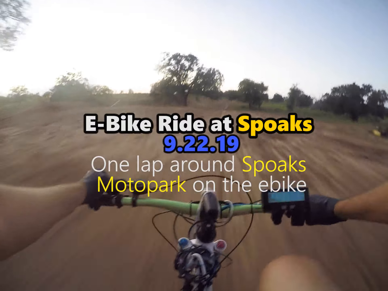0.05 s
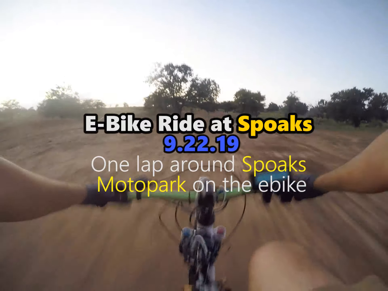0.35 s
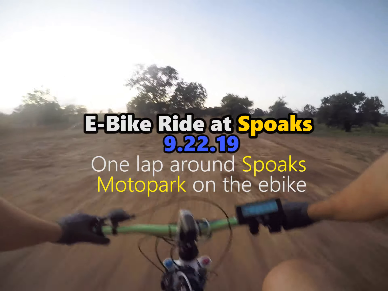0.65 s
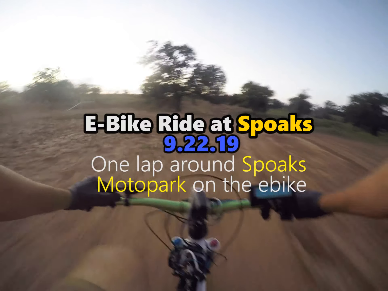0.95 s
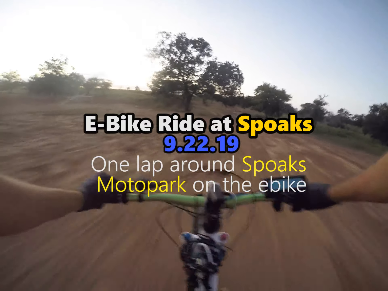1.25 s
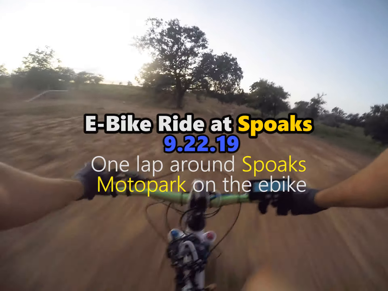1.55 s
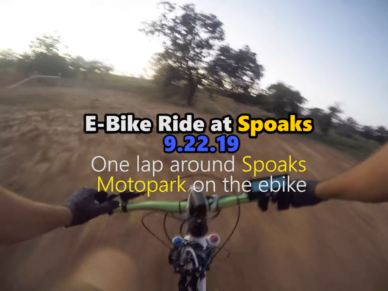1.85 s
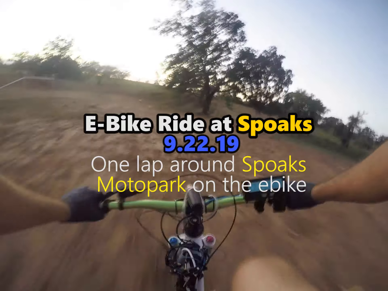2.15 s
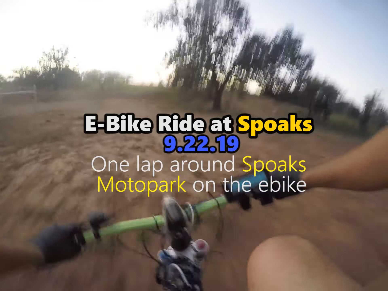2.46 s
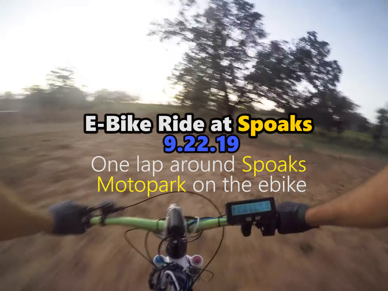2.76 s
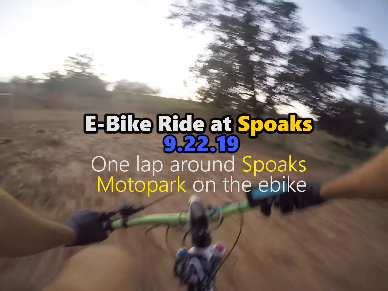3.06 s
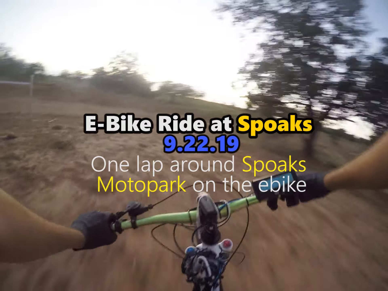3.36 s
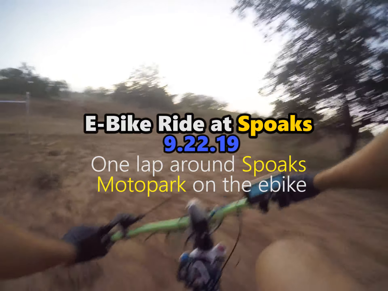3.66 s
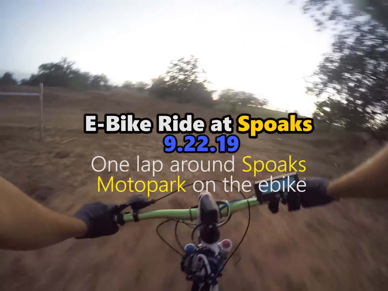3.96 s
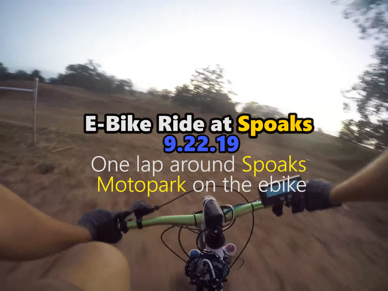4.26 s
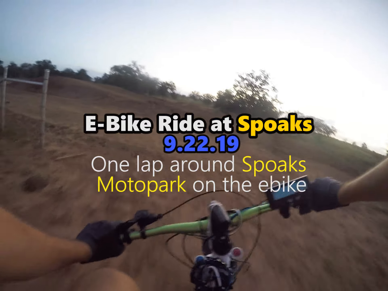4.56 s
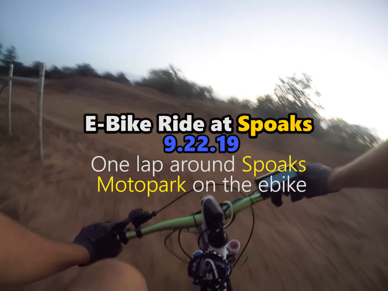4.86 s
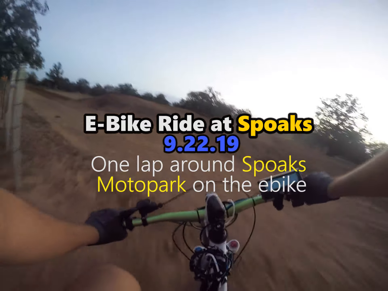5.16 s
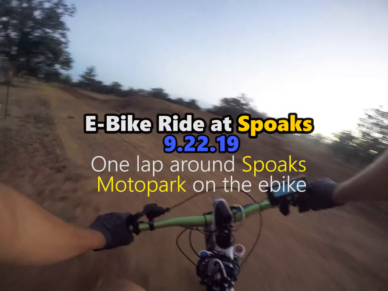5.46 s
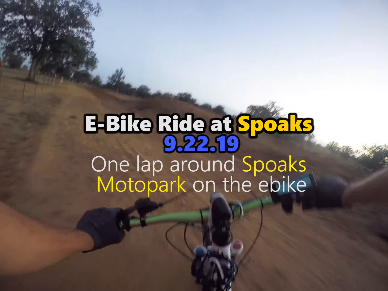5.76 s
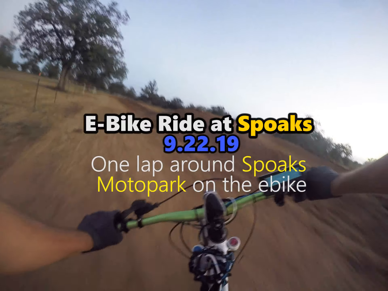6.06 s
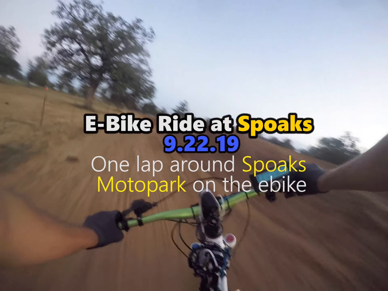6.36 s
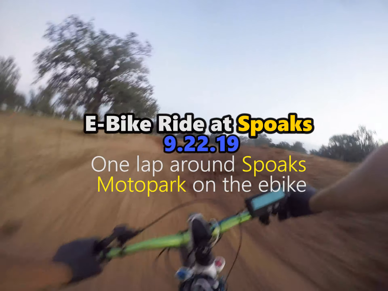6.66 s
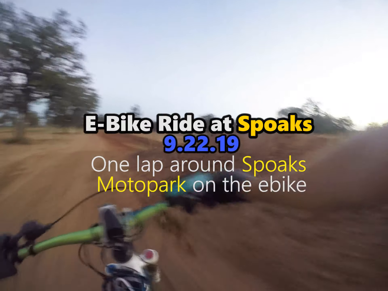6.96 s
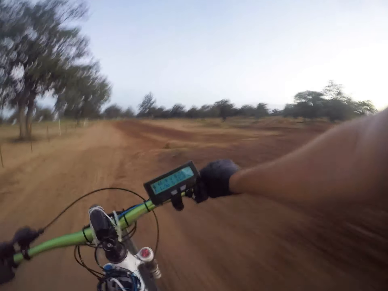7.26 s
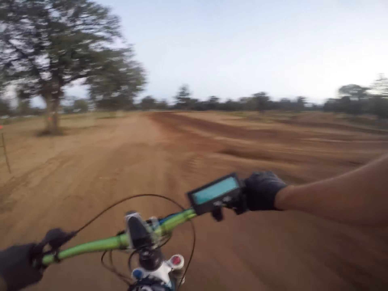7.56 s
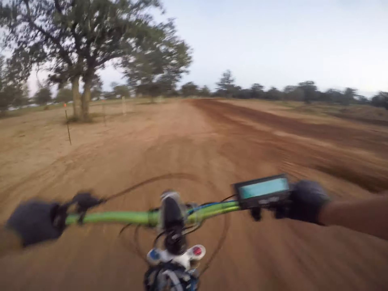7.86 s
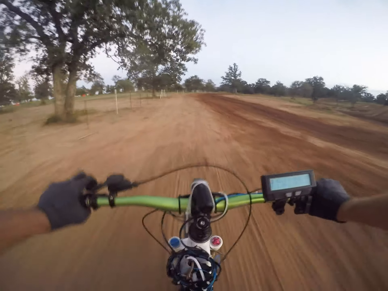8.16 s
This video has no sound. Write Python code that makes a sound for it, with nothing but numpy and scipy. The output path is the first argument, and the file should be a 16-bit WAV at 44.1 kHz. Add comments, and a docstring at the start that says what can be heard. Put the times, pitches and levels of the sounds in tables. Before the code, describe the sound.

An electric mountain bike rides over a dirt track, heard close up from the rider's chest. For the first two seconds or so, knobby tyres drone and rumble, grit crunches and wind thumps on the microphone. Bumps give brief rattles and stones ping off the bike, most sharply around 1.3 seconds. From about 2.4 seconds the bike coasts: the rumble and wind die down and the freewheel ticks faintly, slowing. At 4.1 seconds the motor cuts in with a warble and a few tiny metal squeaks. From 4.5 seconds its gear whine grows louder and climbs in pitch over a rasp and a bright chain sizzle, with more scattered pings. Near 7 seconds the wind and tyre rumble surge, and heavy buffeting continues with the high whine until the end, at about 8.3 seconds.

```python
"""Knobby tyres drone on a dirt track: an electric mountain bike, heard from the rider's chest.
Grit crunches, stones ping off the frame, bumps rattle it. The bike coasts into a bend, the drone fades
and the freewheel ticks. At 4.1 s the geared motor cuts in with a warble, then its meshing teeth whine
up to speed over a rasp while wind buffets the microphone harder."""
import sys
import numpy as np
from scipy import signal
from scipy.fft import rfft, irfft
from scipy.io import wavfile

SR = 44100
rng = np.random.default_rng(int(sys.argv[2]) if len(sys.argv) > 2 else 0)


def int16_out(signal):
    """Quantize to a 16-bit WAV file."""
    q = np.round(np.clip(np.atleast_2d(signal).T, -1, 1) * 32767)
    wavfile.write(sys.argv[1], SR, q.astype(np.int16))


N = 366030

# motor speed: (time [s], gear mesh rate [Hz])
MESH_RATE = [(4.1, 622.4), (4.55, 633.5), (4.95, 777), (5.28, 781), (5.66, 851), (5.76, 916), (5.87, 958),
             (6.06, 961), (6.13, 1072), (6.38, 1012), (6.65, 1083), (6.84, 1141), (6.92, 1092),
             (7.06, 1186), (7.45, 1267), (7.86, 1368), (8.05, 1329), (8.3, 1353)]
# motor pull: (time [s], level [dB])
MOTOR_EFFORT = [(4.08, -87), (4.105, -46), (4.22, -33), (4.33, -38.5), (4.5, -35.5), (4.6, -31),
                (5.22, -28.5), (5.45, -29), (5.68, -32), (5.82, -29), (6.17, -25.5), (6.42, -28.5),
                (7.2, -23.5), (7.85, -23.5), (8.3, -25.5)]
# pushes that load the teeth: (start [s], end [s], gain [dB])
LOAD_PUSHES = [(4.567, 5.417, 6), (5.66, 8.4, 1.5)]
# radiation of gear tones by the motor case: (frequency [Hz], gain [dB])
CASE_RESPONSE = [(600, -47), (800, -21), (960, -11.5), (1200, -10.5), (1530, -7), (1850, -13), (2280, -11),
                 (2560, -2), (2950, -2.5), (3550, 0), (3950, -3.5), (4400, 2.5), (4750, -5), (5250, -7.5),
                 (5800, -14), (6500, -17), (7500, -31), (11000, -32)]
# gear and chain rasp: (frequency [Hz], density [dB])
RASP_SPECTRUM = [(600, -22), (950, -20), (1350, 3.5), (1850, -8), (2150, -6), (2400, -6), (3000, 1),
                 (3500, -3.5), (4300, 0.5), (5600, -9.5), (6500, -7.5), (7400, -38), (10000, -29)]
# drive housing resonances: (frequency [Hz], bandwidth [Hz], level [dB])
HOUSING_MODES = [(1530, 75, -30), (2100, 98, -26.5), (2980, 130, -13), (3103, 93, -8), (4510, 110, -14),
                 (5110, 170, -13.5), (6450, 920, -22)]
# motor hunting: (start [s], rise [s], fall [s], foot [Hz], top [Hz], level [dB])
HUNT_SWOOPS = [(4.097, 0.047, 0.027, 2990, 3290, -36.5), (4.178, .068, 0.032, 2830, 4270, -39.5),
               (4.295, .093, 0.043, 2750, 3300, -36), (4.435, 0.04, 0.093, 2890, 3230, -37),
               (4.548, 0.057, .06, 2900, 3370, -44)]
# low rumble of the tyres, swelled by wind near 7 s: (time [s], level [dB])
RUMBLE_LEVEL = [(0.0, -29), (1.1, -31.5), (2.1, -30), (3.0, -38), (3.9, -47), (4.45, -45), (4.78, -35),
                (5.0, -37), (5.6, -38.5), (6.3, -34.0), (6.72, -31), (6.97, -23.1), (7.45, -24.5),
                (8.3, -35)]
# low rumble: (frequency [Hz], density [dB])
RUMBLE_SPECTRUM = [(100, -14), (150, -9.5), (205, -8.5), (270, 0), (390, -2.5), (490, -5.5), (620, -14),
                   (800, -24), (1200, -28.5), (3000, -65)]
# crushed dirt: (frequency [Hz], density [dB])
CRUNCH_SPECTRUM = [(530, -24), (900, -10), (1130, 1), (1780, -5), (2150, -3.5), (2450, 1), (3130, -0.5),
                   (3480, -8), (4010, -5), (6200, -11), (7400, -26.5), (8630, -25.5), (10100, -28.5),
                   (11700, -41), (15000, -26.5)]
# loose dirt: (centre [s], half length [s], boost [dB])
DIRT_PATCHES = [(.16, 0.14, 4.5), (1.6, 0.62, 4.5), (2.25, 0.65, 3.5), (3.02, 0.094, 5.5),
                (3.45, 0.084, 3.5)]
# stone and chain strikes on the frame: (time [s], level [dB])
FRAME_STRIKES = [(0.0804, -14.5), (1.3013, -8), (1.384, -9), (1.4576, -28.5), (1.7674, -45), (2.159, -31),
                 (2.2948, -30.5), (2.404, -34.5), (2.878, -36), (4.7573, -17.5), (4.766, -24),
                 (4.8464, -29), (5.182, -20), (5.541, -25), (5.794, -20.5), (7.8423, -22), (8.014, -24),
                 (8.2696, -17)]
# frame resonances: (frequency [Hz], gain [dB], t60 [s])
FRAME_MODES = [(2400, -20.5, 0.034), (4170, -5, 0.013), (4690, 6.5, 0.0067), (5380, 8.5, 0.0038),
               (6700, -14.5, 0.021), (8970, -16, 0.012), (10400, -12.5, 0.0068), (14200, -36, 0.0098)]
# bumps in the track: (time [s], level [dB])
BUMPS = [(0.0074, -24.5), (0.7218, -30), (0.939, -34.5), (1.096, -26), (1.1374, -32), (1.475, -29.5),
         (1.7824, -28), (2.0708, -27.5), (2.291, -27.5), (2.879, -33), (2.9626, -30.5), (3.2322, -35.5),
         (3.5235, -37.5)]
# wind, low in the bend, back with speed: (time [s], buffet level [dB], flutter level [dB])
WIND_LEVELS = [(0, -32, -35.5), (1.35, -26.5, -31), (2.2, -25.5, -34.5), (2.4, -28, -45),
               (3.45, -36.5, -46.5), (3.7, -45, -53), (4.5, -40, -52), (5.05, -36.5, -51),
               (5.25, -37, -40.5), (5.65, -35, -39), (6.3, -27.5, -31), (6.76, -34.5, -34.5),
               (6.92, -23, -18), (7.55, -19.5, -19), (8.3, -23, -21.5)]
# single gusts: (centre [s], half length [s], boost [dB])
WIND_GUSTS = [(0.83, 0.028, 13), (1.99, .05, 5), (2.2, 0.046, 12), (2.89, .08, 4)]
# large eddies: (frequency [Hz], density [dB])
BUFFET_SPECTRUM = [(12, -2), (24, -0.5), (45, 1), (58, -10.5), (75, -21), (150, -20)]
# small eddies: (frequency [Hz], density [dB])
FLUTTER_SPECTRUM = [(45, -3.5), (70, 4), (120, -1.5), (170, -5), (220, -6), (380, -9.5), (560, -25),
                    (720, -58), (3000, -67)]
# chain sizzle: (frequency [Hz], density [dB])
CHAIN_SPECTRUM = [(5000, -25), (7000, 1), (8300, 9), (10300, 6.5), (12200, -18), (13400, 5), (14600, 10),
                  (15400, -16)]
# metal squeaks: (start [s], length [s], pitch [Hz], level [dB])
METAL_SQUEAKS = [(1.553, 0.01, 4970, -30), (2.095, 0.01, 6170, -32), (2.095, .025, 11000, -49),
                 (4.099, 0.066, 5910, -41), (4.16, .025, 6430, -49), (4.193, 0.017, 8400, -48),
                 (4.206, 0.023, 5340, -36.5), (4.228, 0.029, 7780, -54)]

MESH_REF_HZ = 1004   # gear tones are clearest here
PUSH_EDGE_S = 0.08


def motor(mesh_per_turn=26.7, rasp_db=-4, throb_db=2.5, ring_db_per_octave=6):
    """Meshing teeth sing over a rasp that rings the housing; both throb with each rotor turn."""
    mesh_hz = curves(MESH_RATE)[0] * (1 + 0.011 * drift(13))   # bumps tug at the rotor
    effort_db, = curves(MOTOR_EFFORT)
    rotor_rad = phase(mesh_hz / mesh_per_turn * (1 + 0.019 * drift(11.5)))
    rasp = colour(grains(14000, 1.8), RASP_SPECTRUM)
    shake = noise()
    speed_db = ring_db_per_octave * np.log2(mesh_hz / MESH_REF_HZ)
    for hz, width_hz, level_db in HOUSING_MODES:
        t60_s = np.log(1000) / (np.pi * width_hz)
        rasp += from_db(level_db + speed_db) * unit_rms(ring(shake, hz, t60_s))
    rasp *= from_db(rasp_db + throb_db * np.cos(rotor_rad))
    return from_db(effort_db) * (gear_tones(mesh_hz, rotor_rad) + rasp)


def gear_tones(mesh_hz, rotor_rad, wobble=0.011, wear_rad=0.77, side_ratio=1.053, side_db=-8.5):
    """An eccentric gear bends and throbs its harmonics each turn; a side tone runs just above each."""
    engaged = np.clip((times_s() - LOAD_PUSHES[0][0]) / PUSH_EDGE_S + 1, 0, 1)
    loss_db_per_harmonic = 4 * np.abs(np.log2(mesh_hz / MESH_REF_HZ))
    depth_db = 3.5 * (740 / mesh_hz) ** 3.1
    throb_db = depth_db * (np.cos(rotor_rad) + 0.7 * np.cos(rotor_rad / 3))   # sags every third turn
    hz = mesh_hz * (1 + wobble * np.sin(rotor_rad) + 0.00793 * drift(40.56))
    mesh_rad = phase(hz)
    out = 0
    for k in range(1, 9):
        harmonic_rad = k * mesh_rad + wear_rad * drift(91)   # worn teeth meet early or late
        side_tone = from_db(side_db) * np.sin(side_ratio * harmonic_rad + 3 * drift(11.8))
        level_db = throb_db * min(1, 2 / k) ** 2 - k * loss_db_per_harmonic + 3 * drift(34)
        out += (np.sin(harmonic_rad) + side_tone) * gain_at(CASE_RESPONSE, k * hz) * from_db(level_db)
    return out * engaged * from_db(tooth_load_db() - depth_db / 2)


def tooth_load_db(slack_db=-6):
    """Teeth press together during each push and slacken otherwise."""
    t = times_s()
    return slack_db + sum((db - slack_db) * np.clip(np.minimum(t - start_s, end_s - t) / PUSH_EDGE_S, 0, 1)
                          for start_s, end_s, db in LOAD_PUSHES)


def hunting(housing_hz=3200, loss_db_per_octave=20, lower_db=-20, edge_s=0.004):
    """Under light load the third gear harmonic swoops, loudest near the housing's pitch."""
    out, waver = np.zeros(N), 1 + 0.0031 * drift(150)
    for start_s, rise_s, fall_s, foot_hz, top_hz, level_db in HUNT_SWOOPS:
        length_s = rise_s + fall_s
        t, span = event_span(start_s, length_s)
        arch = np.sin(np.pi / 2 * np.interp(t, [0, rise_s, length_s], [0, 1, 2]))
        hz = (foot_hz + (top_hz - foot_hz) * arch) * waver[span]
        mesh_rad = phase(hz) / 3
        lower_tones = from_db(lower_db) * (np.sin(mesh_rad) / 2 + np.sin(2 * mesh_rad))
        gain = from_db(level_db - loss_db_per_octave * np.abs(np.log2(hz / housing_hz)))
        fade = np.minimum(np.minimum(t, length_s - t) / edge_s, 1)
        out[span] += np.sqrt(2) * gain * fade * (np.sin(3 * mesh_rad) + lower_tones)
    return out * from_db(3 * drift(55))


def tyres(tread_hz=292, upright_db=-28.5, leaned_db=-50.5, lean_at_s=1.29, fade_db_per_s=17.5):
    """Casing rumble, swelled by wind near 7 s; centre tread blocks drum a note that fades with lean."""
    rumble_db, = curves(RUMBLE_LEVEL)
    rumble = from_db(rumble_db + 2 + 1.97 * drift(16)) * colour(noise(), RUMBLE_SPECTRUM)
    tread_db = np.maximum(upright_db - fade_db_per_s * np.maximum(times_s() - lean_at_s, 0), leaned_db)
    drone = np.sqrt(2) * np.sin(phase(tread_hz * (1 + 0.0209 * drift(26))))
    flicker = unit_rms(from_db(4.8 * drift(32)))
    return rumble + drone * from_db(tread_db) * flicker


def dirt(base_db=-39.5, rumble_ref_db=-29, grit_db=-22, grit_t60_s=0.006):
    """Grains crush in clumps under the knobs, softer when the rumble is low; grit ticks on the bike."""
    rumble_db, = curves(RUMBLE_LEVEL)
    crunch_db = base_db + 0.51 * np.minimum(rumble_db - rumble_ref_db, 0) + swells_db(DIRT_PATCHES)
    crush = colour(grains(7000, 2.3) * from_db(2.5 * drift(62)), CRUNCH_SPECTRUM)
    grit = sum(unit_rms(ring(grains(45, 5), hz, grit_t60_s)) for hz in np.geomspace(3500, 14500, 14))
    return from_db(crunch_db) * (crush + from_db(grit_db) * unit_rms(grit))


def frame_pings(trim_db=1, chatter=0.017, chatter_s=0.0043):
    """Each hard contact strikes the frame's modes, then chatters briefly."""
    blows, samples = np.zeros(N), 1200
    for time_s, level_db in FRAME_STRIKES:
        contact = chatter * rng.standard_normal(samples) * np.exp(-np.arange(samples) / SR / chatter_s)
        contact[0] = 1
        at = int(time_s * SR)
        blows[at:at + samples] += from_db(level_db + trim_db) * contact[:N - at]
    return sum(ring(blows * from_db(db + 0.5 * drift(6.7)), hz, t60_s) for hz, db, t60_s in FRAME_MODES)


def knocks(trim_db=-2, decay_s=0.011, clunk_db=2):
    """Bumps shake cables and plastic parts into a brief rattle with a dull clunk."""
    jolts = np.zeros(N)
    for time_s, level_db in BUMPS:
        jolts[int(time_s * SR)] = from_db(level_db + trim_db)
    envelope = signal.lfilter([1], [1, -np.exp(-1 / (decay_s * SR))], jolts + 1e-18)
    rattle = colour(noise(), [(900, 1), (1300, 9), (1900, 1.5), (2800, 9.5), (5500, -3), (8000, -16)])
    return envelope * rattle + from_db(clunk_db) * ring(jolts, hz=1280, t60_s=0.024)


def wind(flicker_db=1.55):
    """Large eddies thump on the microphone port; small ones flutter across it."""
    buffet_db, flutter_db = curves(WIND_LEVELS)
    buffet_db += 1 + swells_db(WIND_GUSTS) + 0.5 * drift(4.6)
    buffet = from_db(buffet_db) * colour(noise(), BUFFET_SPECTRUM)
    flutter = from_db(flutter_db + 2) * colour(noise(), FLUTTER_SPECTRUM)
    return (buffet + flutter) * unit_rms(from_db(flicker_db * drift(41)))


def chain(offset_db=-25.5, load_share=0.45, clump_db=4.5):
    """Dusty links roll onto the teeth with a bright sizzle that grows with the motor's pull."""
    effort_db, = curves(MOTOR_EFFORT)
    sizzle_db = effort_db + offset_db + load_share * tooth_load_db() + clump_db * drift(60)
    return from_db(sizzle_db) * colour(grains(9000, 4.8), CHAIN_SPECTRUM)


def squeaks():
    """Metal parts rub in short, unsteady high notes."""
    out, waver = np.zeros(N), 1 + 0.0033 * drift(400)
    for start_s, length_s, hz, level_db in METAL_SQUEAKS:
        t, span = event_span(start_s, length_s)
        envelope = np.sqrt(2 * np.sin(np.pi * t / length_s))
        out[span] += from_db(level_db) * envelope * np.sin(phase(hz * waver[span]))
    return out


def freewheel(start_s=2.4, end_s=4.1, start_rate_hz=27, slowing_hz_per_s=7, click_db=-47):
    """Pawls drop over the ratchet in faint bright ticks, slowing until the motor takes over."""
    t = times_s()
    rate_hz = (start_rate_hz - slowing_hz_per_s * (t - start_s)) * (t > start_s) * (t < end_s)
    teeth_passed = np.floor(np.cumsum(rate_hz) / SR)
    clicks = np.diff(teeth_passed, prepend=0) * from_db(click_db + 4 * drift(30))
    return sum(from_db(db) * ring(clicks, hz, t60_s)
               for hz, db, t60_s in [(14000, 0, 0.004), (10500, -7, 0.004), (4700, -6, 0.003)])


def controller(hz=6234, level_db=-68):
    """The motor electronics whistle faintly throughout."""
    return np.sqrt(2) * from_db(level_db) * np.sin(2 * np.pi * hz * times_s())


def hiss(level_db=-69):
    """Soft, even background hiss."""
    return from_db(level_db) * colour(noise(), [(1000, 5.5), (7000, 10), (12000, 5), (14500, -12)])


def from_db(db):
    """Decibels to gain."""
    return 10 ** (np.asarray(db) / 20)


def unit_rms(x):
    """Scale to unit power."""
    return x / np.sqrt(np.mean(x ** 2) + 1e-20)


def times_s():
    """Time of each sample."""
    return np.arange(N) / SR


def event_span(start_s, length_s):
    """An event's local time [s] and its slice of the scene."""
    t = np.arange(int(length_s * SR)) / SR
    at = int(start_s * SR)
    return t, slice(at, at + len(t))


def curves(rows):
    """Each column after time, interpolated to every sample."""
    time_s, *columns = np.transpose(rows)
    return [np.interp(times_s(), time_s, column) for column in columns]


def swells_db(rows):
    """One smooth rise and fall in level per row."""
    return sum(db * np.cos(np.pi / 2 * np.clip((times_s() - centre_s) / half_s, -1, 1)) ** 2
               for centre_s, half_s, db in rows)


def gain_at(spectrum, hz):
    """Gain of a spectrum at any frequency."""
    known_hz, level_db = np.transpose(spectrum)
    return from_db(np.interp(np.log(hz + 1), np.log(known_hz), level_db))


def colour(x, spectrum):
    """Filter by a spectrum, 12 dB/octave skirts outside it; unit power."""
    hz = np.arange(N // 2 + 1) * SR / N
    skirts = np.minimum(hz / spectrum[0][0], 1) ** 2 * np.minimum(spectrum[-1][0] / (hz + 1), 1) ** 2
    return unit_rms(irfft(rfft(x) * gain_at(spectrum, hz) * skirts, N))


def noise():
    """White noise."""
    return rng.standard_normal(N)


def drift(rate_hz):
    """Slow random wander, unit RMS."""
    size = 2 ** 14
    hz = np.arange(size // 2 + 1) * SR / N
    slow = irfft(rfft(rng.standard_normal(size)) / (1 + (hz / rate_hz) ** 2), size)
    return np.interp(np.linspace(0, size - 1, N), np.arange(size), unit_rms(slow))


def phase(hz):
    """Running phase [rad] of a changing frequency."""
    return 2 * np.pi * np.cumsum(hz) / SR


def ring(x, hz, t60_s):
    """Resonator: a unit click starts a decaying unit sine."""
    r, w = np.exp(-np.log(1000) / (SR * t60_s)), 2 * np.pi * hz / SR
    return signal.lfilter([0, np.sin(w)], [1, -2 * r * np.cos(w), r * r], x + 1e-18)


def grains(per_s, spread_db):
    """Random clicks, many small and a few large."""
    sizes = from_db(spread_db * np.minimum(rng.exponential(1, N), 5))
    return unit_rms((rng.random(N) < per_s / SR) * sizes * rng.choice([-1, 1], N))


def scene():
    """Mono mix in open air; all sources ride with the listener."""
    ground = tyres() + dirt() + frame_pings() + knocks()
    drive = motor() + hunting() + chain() + squeaks() + freewheel() + controller()
    return (wind() + ground + drive + hiss())[None]


def record(dry, ceiling=0.53, cutoff_hz=15500):
    """Soft clip, then a steep low-pass."""
    rounded = ceiling * np.tanh(dry / ceiling)
    return signal.sosfilt(signal.ellip(10, 0.2, 95, cutoff_hz, fs=SR, output="sos"), rounded)


dry = scene()
out = record(dry)
int16_out(out)
```